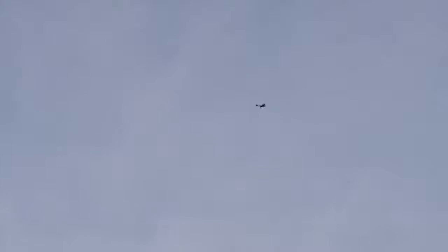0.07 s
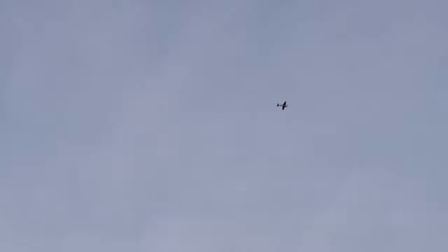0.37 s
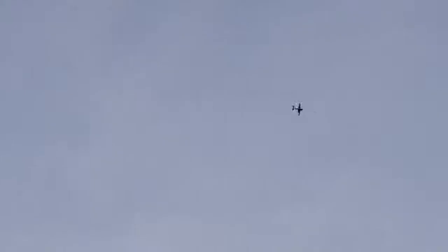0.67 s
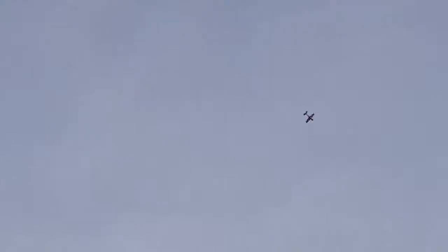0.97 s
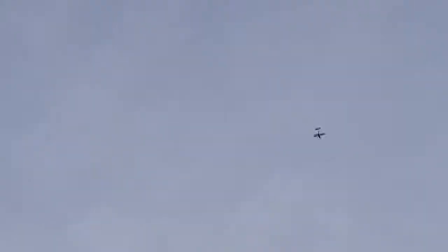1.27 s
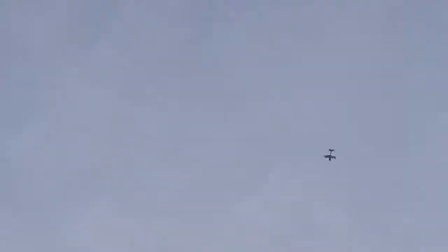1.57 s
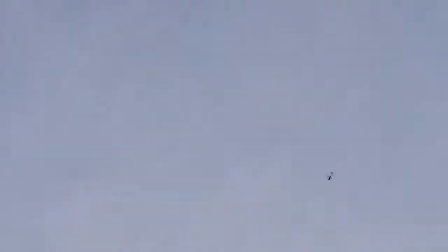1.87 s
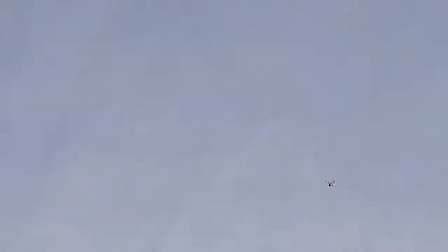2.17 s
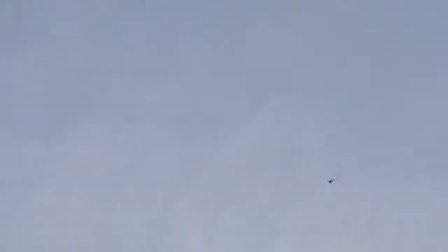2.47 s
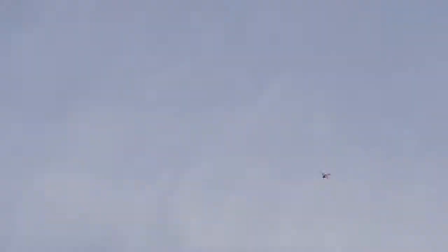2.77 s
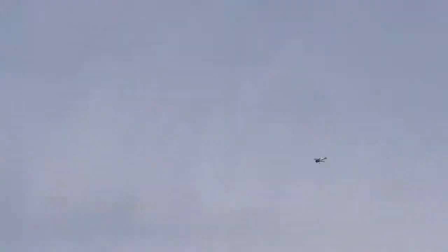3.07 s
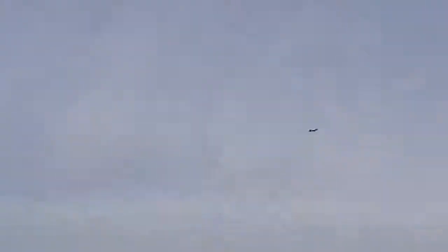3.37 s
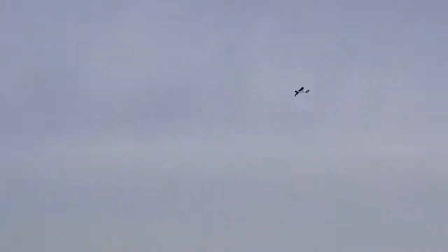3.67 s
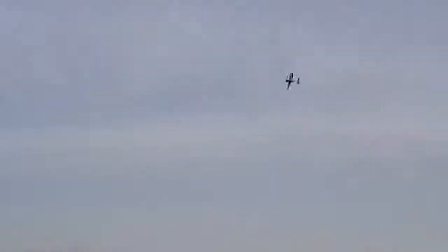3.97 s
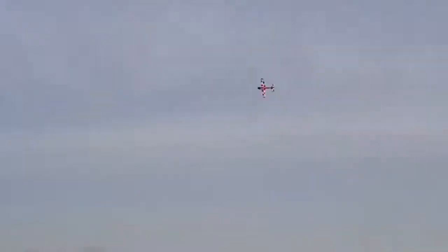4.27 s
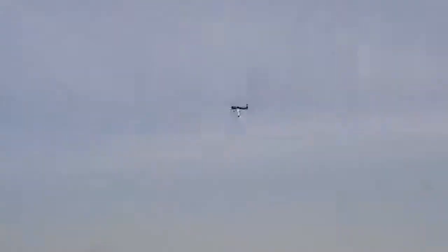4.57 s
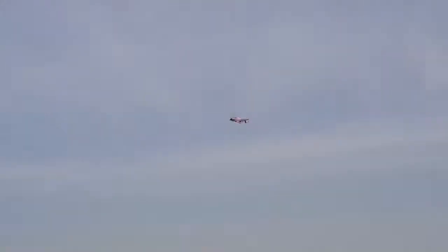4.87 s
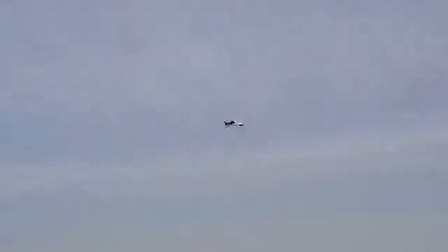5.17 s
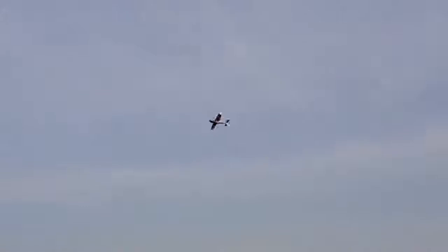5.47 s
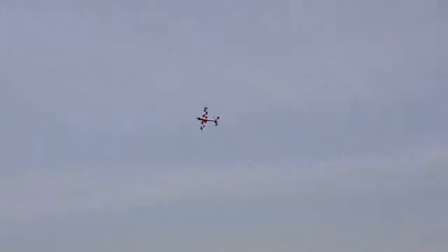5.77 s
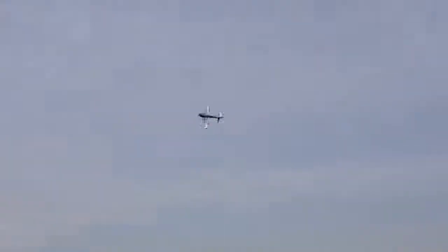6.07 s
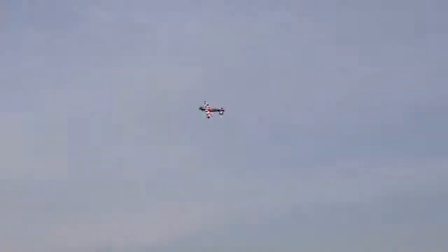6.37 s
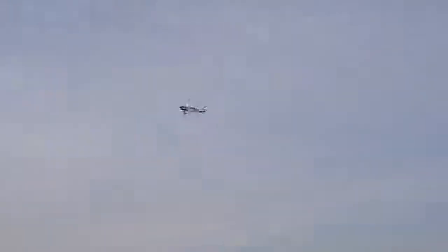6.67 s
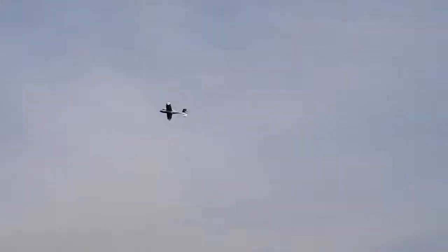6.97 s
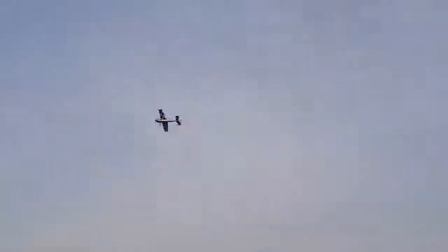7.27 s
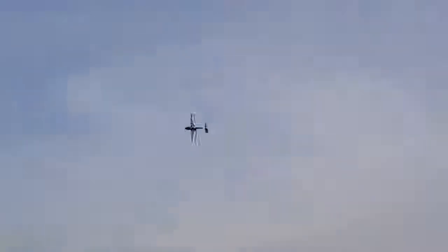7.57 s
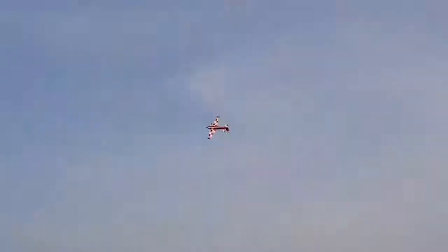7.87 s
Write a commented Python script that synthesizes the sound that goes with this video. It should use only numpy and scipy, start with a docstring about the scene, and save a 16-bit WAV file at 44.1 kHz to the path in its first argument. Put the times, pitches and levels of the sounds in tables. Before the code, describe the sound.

A raspy model plane buzzes through aerobatic rolls outdoors, its throttle dipping and sputtering before it runs at full power and comes nearer.

```python
"""A model stunt plane with a two-stroke engine rolls over an open field and comes nearer.
The throttle is blipped through the first rolls, with misfires and pops, then held open.
Each firing pushes gas through the muffler: a bark and a puff of hiss, loudest when a roll swings
the exhaust towards the listener. Engine and propeller add a low drone. Every firing arrives twice,
direct and off the ground; a low hum and soft outdoor air lie beneath."""
import sys
import numpy as np
from scipy import signal
from scipy.fft import rfft, irfft, next_fast_len
from scipy.io import wavfile
from scipy.ndimage import uniform_filter1d, map_coordinates

SR = 44100
rng = np.random.default_rng(int(sys.argv[2]) if len(sys.argv) > 2 else 0)


def to_wav(s):
    """Save 16-bit WAV."""
    ch = np.atleast_2d(s).T  # columns
    pcm = np.round(np.clip(ch, -1, 1) * 32767)  # PCM
    wavfile.write(sys.argv[1], SR, pcm.astype(np.int16))


N = 353682
TIME = np.arange(N) / SR


def from_db(db):
    """Turn decibels into a number to multiply by."""
    return 10 ** (np.asarray(db) / 20)


def rms_one(x):
    """Scale a sound to an average power of 1."""
    return x / np.sqrt(np.mean(x ** 2) + 1e-20)


def in_time(rows):
    """Join a table's rows with straight lines: one curve in time per value column."""
    times, *columns = np.transpose(rows)
    return [np.interp(TIME, times, column) for column in columns]


def at_hz(spectrum, hz):
    """Look up a level between the listed frequencies, on a scale of octaves."""
    listed_hz, db = np.transpose(spectrum)
    return np.interp(np.log(hz + 1e-3), np.log(listed_hz), db)


def coloured(x, spectrum, amount=1):
    """Turn each frequency up or down by a table's decibels times amount."""
    size = next_fast_len(N + SR // 10)
    hz = np.arange(size // 2 + 1) * SR / size
    return irfft(rfft(x, size) * from_db(amount * at_hz(spectrum, hz)), size)[..., :N]


def band(x, hz, kind, order=3):
    """Keep a range of frequencies without delaying the sound."""
    return signal.sosfiltfilt(signal.butter(order, hz, kind, fs=SR, output="sos"), x)


def drift(rate_hz, step=50):
    """A smooth random wobble, about 1 in size."""
    pole = np.exp(-2 * np.pi * rate_hz * step / SR)
    noise = rng.standard_normal(N // step + 2002)
    slow = signal.lfilter([1], [1, -2 * pole, pole * pole], noise)[2000:]
    return np.interp(np.arange(N) / step, np.arange(len(slow)), rms_one(slow))


def delayed(x, ms):
    """Play a sound later, by a time that may keep changing."""
    return map_coordinates(x, [np.arange(N) - ms * SR / 1000], order=3, mode="mirror")


def loudness(x, size=1500):
    """The average strength of a sound over a few firings."""
    power = uniform_filter1d(uniform_filter1d(x * x, size), size)
    return np.sqrt(np.abs(power) + 1e-12)


# how fast the engine fires, as heard: (time [s], firing rate [Hz])
FIRING_RATE = [(0.0, 112.8), (0.114, 111.8), (0.483, 114.6), (0.821, 115.1), (0.992, 118.1), (1.104, 117.7),
               (1.186, 97.9), (1.309, 109.3), (1.486, 114.7), (1.606, 114.0), (1.712, 117.6), (1.854, 81.1),
               (1.981, 99.6), (2.091, 94.2), (2.25, 102.0), (2.43, 100.2), (2.563, 111.1), (2.792, 78.2),
               (2.963, 110.3), (3.106, 104.0), (3.233, 114.9), (3.417, 95.9), (3.583, 115.3),
               (3.707, 120.0), (3.781, 120.0), (3.907, 101.3), (4.098, 117.4), (4.273, 116.2),
               (4.365, 106.7), (4.597, 119.0), (4.783, 120.7), (4.85, 118.4), (5.044, 124.3),
               (5.261, 124.5), (5.328, 121.3), (5.521, 125.7), (5.712, 125.7), (5.747, 124.0),
               (6.079, 126.3), (6.556, 126.4), (6.79, 123.3), (7.04, 126.1), (7.045, 125.5), (7.158, 123.2),
               (7.338, 123.2), (7.384, 121.6), (7.614, 121.5), (7.758, 119.8), (8.02, 120.0)]

def engine_speed(inertia_s=.035):
    """One firing per turn of the shaft; the weight of shaft and propeller smooths each change."""
    return uniform_filter1d(in_time(FIRING_RATE)[0], int(inertia_s * SR))


def firing_strength(turns, spread_db):
    """Every burn of fuel has a random strength of its own."""
    firings = np.arange(1000)
    chance = np.clip(rng.standard_normal(len(firings)), -2, 2)
    strength = from_db(spread_db * np.interp(turns, firings, chance))
    return strength / loudness(strength)


# moments when the exhaust faces the listener, with base levels for its four tone bands and its hiss:
# (time [s], bark [dB], blare [dB], bite [dB], edge [dB], rasp [dB])
ROLLS = [(0.109, -37.5, -39, -47.5, -44, -50.5), (0.772, -39, -37, -42.5, -41.5, -47.5),
         (1.435, -37, -37.5, -49, -41.5, -50.0), (2.089, -40, -40.5, -45.5, -43.5, -53.0),
         (2.571, -40.5, -42.5, -46, -42, -53), (3.171, -43, -37.5, -44.5, -42.0, -50.5),
         (3.694, -36.5, -36.5, -44.5, -41.5, -48), (4.171, -33.0, -36.5, -38.5, -40.5, -45.5),
         (4.676, -30.5, -35, -41, -39, -45.5), (5.156, -31, -34, -37.5, -39, -43.5),
         (5.647, -30, -33, -37.5, -38, -43), (6.14, -30, -36, -35, -34, -42),
         (6.639, -31, -33.5, -32.5, -34.5, -40), (7.144, -31, -34.5, -32, -35.5, -41.5),
         (7.64, -31.5, -34.5, -34.5, -36, -40), (8.209, -26.5, -42, -33, -34, -44)]

def rolling():
    """The plane turns once from each row to the next; its exhaust grows louder as it nears."""
    times = np.transpose(ROLLS)[0]
    times = np.r_[2 * times[0] - times[1], times]  # already rolling at the start
    return np.interp(TIME, times, np.arange(len(times))), in_time(ROLLS)


# how fully the loud and quiet directions are heard, most when side-on: (time [s], share [0-1])
SIDE_ON = [(0, 0.3), (3.8, 0.1), (5.3, 0.94), (7.35, 1), (7.65, 0.67), (8.02, 0.74)]

def beamed(pattern, roll):
    """Decibels gained or lost as the roll sweeps loud and quiet directions past the listener."""
    angle, *columns = np.transpose(pattern)
    swept_db = np.array([np.interp(roll, angle, column, period=1) for column in columns])
    return in_time(SIDE_ON)[0] * swept_db


def effort(speed, db_per_octave, cruise_hz=120):
    """Decibels gained or lost as the engine runs above or below cruising speed."""
    return np.outer(db_per_octave, np.log2(speed / cruise_hz))


# loud and quiet directions of the exhaust around the plane:
# (angle from the listener [turns], bark [dB], blare [dB], bite [dB], edge [dB], rasp [dB])
EXHAUST_BEAM = [(-0.5, -0.5, 6.5, 1.0, 0.5, 1.5), (-0.42, 6.5, -4, -5, -5, 2), (-0.33, 0, -1.5, -1, 0, 2),
                (-0.25, -2, -1, -9, 2.5, 3), (-0.17, 3.5, -1, 2, 3.5, 3.5),
                (-0.08, 2.5, 2.5, 0.5, 0.0, 3.5), (0.0, 3, 2, 0.5, -2.0, 0.5), (0.08, 1.5, 1.5, 1.5, -4, 4),
                (0.17, 1, -2.0, -7.5, 1, 2.5), (0.25, -4.5, 1, -5, -1.0, 1), (0.33, 1.5, -6.5, 0, -1, 0.5),
                (0.42, 1, -1.5, -4.5, 0.5, 0.5)]

def exhaust_levels(base_db, speed, roll):
    """Bark, blare, bite, edge and rasp swell once a roll and change with engine speed."""
    swing_db = np.outer([4, 4.6, 5.5, 3.9, 5.03], np.cos(2 * np.pi * roll))
    effort_db = effort(speed, db_per_octave=[-5, -0.5, -2, 9.5, -1])
    return base_db + swing_db + beamed(EXHAUST_BEAM, roll) + effort_db


# the tone bands bark, blare, bite and edge: (lowest tone [x firing rate], highest tone [x firing rate])
TONE_BANDS = [(6, 8), (9, 11), (12, 14), (15, 40)]
# how well the muffler lets each frequency out: (frequency [Hz], level [dB])
MUFFLER_COLOUR = [(500, 11), (780, 10.5), (1050, 8.5), (1350, 4), (1600, 1), (1850, -2), (2250, -8.5),
                  (2700, -18), (3300, -25.5), (5000, -38), (6500, -42)]

def exhaust_bark(turns, speed, strength, levels_db, roll, flutter_db=2.5):
    """Each firing is a sharp push and suck of gas, built from tones at multiples of the firing rate."""
    shaft, out = np.exp(2j * np.pi * turns), np.zeros(N)
    flutters = [from_db(flutter_db * drift(9)) for _ in range(7)]
    # swirling gas blurs the higher tones, most when the exhaust faces away
    eddies = [drift(25) + 1j * drift(25) for _ in range(5)]
    blur = .022 * (1 - .5 * np.cos(2 * np.pi * roll))
    for (first, last), db in zip(TONE_BANDS, levels_db):
        tone, pulses = shaft ** first, np.zeros(N)
        smears = [1 + first * blur * eddy for eddy in eddies]
        for k in range(first, last + 1):
            colour = np.repeat(from_db(at_hz(MUFFLER_COLOUR, k * speed[::16])), 16)[:N]
            pulses -= colour * flutters[k % len(flutters)] * (tone * smears[k % len(smears)]).imag
            tone = tone * shaft  # step up to the next multiple
        heard = with_ground(muffler(pulses * strength))
        out += from_db(db) * heard / loudness(heard)  # even the band out, then set its level
    return out


def muffler(pulses, chamber_hz=1900, ring_hz=2290, ring_gain=1.8):
    """The chamber draws each pulse out, and the can adds a nasal ring."""
    held_back = signal.lfilter(*signal.iirpeak(chamber_hz, Q=3, fs=SR), pulses)
    drawn_out = pulses - 2 * held_back
    ring = signal.lfilter(*signal.iirpeak(ring_hz, Q=8, fs=SR), drawn_out)
    return drawn_out + ring_gain * ring


# the sound's bounce off the ground: (time [s], extra travel time [ms], share sent back [0-1])
GROUND_BOUNCE = [(0, 6.06, .4), (.8, 6.0, .56), (1.4, 5.83, .46), (2, 5.34, .65), (2.6, 4.59, .63),
                 (3.1, 4.14, .63), (3.6, 3.6, .5), (4.15, 3.16, .68), (5.15, 2.94, .68), (5.9, 2.93, .63),
                 (6.3, 3.11, .31), (6.7, 3.14, .45), (7.15, 3.25, .65), (7.6, 3.25, .65), (8.02, 3.05, .46)]

def with_ground(x, dull_above_hz=5000):
    """Grass sends back a duller copy a few milliseconds later."""
    delay_ms, share = in_time(GROUND_BOUNCE)
    pole = np.exp(-2 * np.pi * dull_above_hz / SR)
    dull = signal.filtfilt([1 - pole], [1, -pole], x)
    return x + share * delayed(dull, delay_ms)


# base levels of the drone's five tones, at 1 to 5 times the firing rate:
# (time [s], firing tone [dB], blade tone [dB], third [dB], fourth [dB], fifth [dB])
DRONE_LEVELS = [(0.0, -42, -43, -30, -37, -54), (0.4, -44, -38, -33, -41, -49),
                (0.48, -55, -33.5, -36.5, -33, -50), (0.72, -40.5, -46, -42, -35, -43),
                (0.88, -40, -38.5, -36.5, -32, -48), (1.04, -41.0, -53, -34, -29, -61),
                (1.2, -55, -28.5, -34.0, -59, -35), (1.36, -44, -39.5, -31.0, -36, -43),
                (1.68, -43, -42, -29.0, -39, -50), (1.76, -52, -37, -36, -57, -45),
                (1.84, -45, -39, -50, -35, -34), (2.24, -57, -31, -46, -50, -40),
                (2.32, -55, -42, -52, -39, -44), (2.48, -56.0, -28, -42.5, -50, -42),
                (2.56, -52.0, -29.5, -45, -35, -40), (2.8, -45, -55, -34.5, -47, -36),
                (2.96, -57, -34.0, -42, -44, -40), (3.12, -54, -31, -38.5, -44, -32.5),
                (3.2, -47.0, -40, -43, -35.5, -32.5), (3.52, -56, -35, -33.5, -49.0, -33.5),
                (3.6, -46, -28, -41, -34, -34), (3.76, -43, -33.5, -46, -33, -33),
                (3.92, -50, -38, -32, -56.5, -33), (4.16, -42.0, -30, -36, -36.5, -30.5),
                (4.24, -41, -41, -30.5, -43, -35), (4.4, -53, -37.5, -33.5, -53, -37),
                (4.64, -38, -30, -36, -41, -31.5), (4.8, -42, -36, -39.5, -42.0, -32),
                (6.88, -44, -29.5, -42.5, -35, -26.5), (7.12, -46, -35.5, -38, -33.5, -30.5),
                (7.2, -42.5, -27.5, -50, -35.5, -20.5), (7.28, -48, -31, -29, -34.0, -29.5),
                (7.44, -44.0, -24, -49, -31, -28), (7.52, -49.5, -21.5, -46.0, -47, -21.5),
                (7.6, -40, -35.5, -47, -35.5, -24), (7.76, -40, -27, -30, -42, -24.5),
                (7.84, -45, -29.5, -40, -34, -32.5), (8.02, -46, -22, -30.5, -31, -27.5)]
# loud and quiet directions of the drone around the plane:
# (angle from the listener [turns], firing tone [dB], blade tone [dB], third [dB], fourth [dB], fifth [dB])
DRONE_BEAM = [(-0.5, -5, 4, 2, -1.5, 1), (-0.44, -1.5, 2, 3, -3, 0.5), (-0.38, -8, 0.5, 6.5, -8.5, -8),
              (-0.31, -5.5, -1.5, 6.5, -3.5, -5.5), (-0.25, -2.0, -1, 1, 2.5, -4),
              (-0.19, 1, 2, 0.5, 3.5, 2.5), (-0.12, -1.5, 0.5, 5, 6.0, -1), (-0.06, 3, 5.5, -2.5, 5, 2),
              (0.0, 2, 3.5, 6, -0.5, 3.5), (0.06, 1, 6, -3, 4.0, 3.0), (0.12, 1.5, 4, 0, 4.5, 0),
              (0.19, 0.5, -0.5, -0.5, 2, 1.5), (0.25, 2.5, -14, -11.5, -1.5, 0),
              (0.31, 2.5, -4.5, -2, -1, -0.5), (0.38, 1, 2, -2.5, -20.5, -5),
              (0.44, -2.5, 2.5, -2.5, 0, -5)]

def drone(turns, speed, strength, roll, trim_db=0.25):
    """Engine and propeller make five low tones; the higher ones flutter more."""
    levels_db = in_time(DRONE_LEVELS) + beamed(DRONE_BEAM, roll) + effort(speed, db_per_octave=8)
    delay_ms, share = in_time(GROUND_BOUNCE)
    out = np.zeros(N)
    for k, level_db in enumerate(levels_db, 1):
        bounce = share * np.exp(-2j * np.pi * k * speed * delay_ms / 1000)
        shift = np.angle(1 + bounce)  # the ground bounce nudges each wave earlier or later
        flutter_db = np.sqrt(k) * drift(12)
        gain = np.sqrt(2) * from_db(level_db + trim_db + flutter_db)
        out -= gain * np.sin(2 * np.pi * k * turns + shift)
    return out * strength


# hiss of the gas jet: (frequency [Hz], level [dB])
HISS_COLOUR = [(200, -2), (450, 5), (1000, 6), (1600, 6.5), (2300, 10), (2800, 4), (4000, 3), (5300, 2),
               (6400, -3.5), (7600, 5.5), (8800, -10.5), (10000, -20), (11400, -20.5), (14500, -37.5)]
# how wide the hiss sounds: (frequency [Hz], part that differs between the ears against shared part [dB])
HISS_WIDTH = [(700, -14), (2000, -13), (4000, -5), (7000, -3.5), (9000, -8), (12000, -6)]
# which way the hiss leans: (frequency [Hz], left minus right [dB])
HISS_LEAN = [(3000, -1.5), (6000, 3.5), (8000, 3.5), (9200, -11), (11000, 12)]
# the very top of the hiss, faint at first and brighter later: (time [s], level [dB])
HISS_TOP = [(0, -16), (1.4, -3.5), (2.5, 0), (3.7, 9), (4.5, 12), (5.5, 11), (6.5, 13), (8.02, 12)]

def rasp(turns, level_db, roll, puff_turns=.08, trim_db=-1):
    """Each firing lets out a short puff of hiss over the swish of the blades."""
    facing = np.cos(2 * np.pi * roll)  # 1 when the exhaust points at the listener
    swish = .3 * from_db(-1.5 * facing)
    since_puff = (turns + .03) % 1
    puffs = np.exp(-since_puff / puff_turns) * firing_strength(turns, spread_db=1.6)
    shared, side = [with_ground((swish + puffs) * rng.standard_normal(N)) for _ in range(2)]
    shared = coloured(shared, HISS_COLOUR)
    side = coloured(coloured(side, HISS_COLOUR), HISS_WIDTH)
    ears = np.array([coloured(shared + sign * side, HISS_LEAN, sign / 2) for sign in (1, -1)])
    top = band(ears, 9600, "high", order=6)
    ears = ears - top + top * from_db(in_time(HISS_TOP)[0])
    # the upper treble comes out in a narrower beam than the rest
    upper = band(ears, 6300, "high", order=4)
    ears = ears - upper + upper * from_db(3 * (facing - 1.5))
    return ears * from_db(level_db + trim_db) / np.std(band(shared, [3000, 9000], "band"))


# how far to the right the plane is: (time [s], delay at the left ear [ms])
LEFT_EAR_DELAY = [(0, .015), (1.7, .04), (4.2, .045), (5.3, .025), (6.2, .01), (8.02, 0)]

def near_reflection(engine, lag_ms=1.1):
    """A quick echo reaches the ears unequally; gives both ears and the left ear's delay."""
    late_ms, = in_time(LEFT_EAR_DELAY)
    echo_db = -20 + 150 * late_ms  # stronger when the plane is off to one side
    echo = delayed(band(engine, 970, "high"), lag_ms) * from_db(echo_db)
    return np.array([engine + echo, engine - echo]), late_ms


# what the surroundings send back: (frequency [Hz], level against the direct sound [dB])
SCATTER_COLOUR = [(250, -18), (600, -11), (1200, -9), (2200, -4.5), (4000, -5), (10000, -3)]

def scatter(x, fade_s=.12):
    """The surroundings return a short wash of echoes; its upper part differs between the ears."""
    tails = rng.standard_normal((2, SR)) * from_db(-60 * TIME[:SR] / fade_s)
    tails /= np.linalg.norm(tails[0])
    shared, side = signal.fftconvolve(coloured(x, SCATTER_COLOUR)[None], tails, axes=1)[:, :N]
    side = 0.09 * band(side, 500, "high", order=1)
    return np.array([shared + side, shared - side])


# the colour of the outdoor air: (frequency [Hz], relative level [dB])
AIR_COLOUR = [(20, -30), (40, -3.5), (65, -24), (110, -7), (170, -15), (400, -9), (900, -9), (1500, -20),
              (2200, -22), (5000, -45), (8500, -74), (12000, -72)]

def outdoor_air(level_db=-47):
    """A soft, low rush, almost the same in both ears."""
    shared, side = rms_one(coloured(rng.standard_normal((2, N)), AIR_COLOUR))
    return from_db(level_db) * np.array([shared + side / 10, shared - side / 10])


def low_hum(pitch_hz=77.6, waver_hz=6.4, level_db=-48.5):
    """One low tone that wavers in strength and pitch."""
    wavering = drift(waver_hz) + 1j * drift(waver_hz)
    tone = (1 + 0.66 * wavering) * np.exp(2j * np.pi * pitch_hz * TIME)
    return from_db(level_db) * rms_one(tone.real)


# stretches of weak firing: (start [s], end [s], level the bark loses [dB])
MISFIRES = [(1.145, 1.24, 4), (1.755, 1.9, 8.5), (2.627, 2.725, 7.5), (3.314, 3.08, 5.5),
            (3.399, 3.425, 4.5), (3.798, 4.06, 2)]

def misfire_loss(fade_s=.012):
    """With the throttle shut the engine misfires, and its bark drops by this many decibels."""
    dips = [db * np.clip(1 + np.minimum(TIME - start, end - TIME) / fade_s, 0, 1)
            for start, end, db in MISFIRES]
    return np.max(dips, axis=0)


# single hard burns amid the misfiring: (time [s], peak at the muffler [dB])
POPS = [(1.736, -29), (1.764, -25), (1.784, -23.5), (1.825, -26.5), (1.861, -26), (1.885, -22),
        (2.625, -19), (2.644, -17), (2.665, -18), (2.685, -18.5), (2.73, -27.5), (2.78, -33), (3.401, -19),
        (3.42, -23), (3.8, -21), (3.809, -18), (3.818, -17), (3.835, -22), (3.854, -18.5), (3.873, -24),
        (3.892, -23)]

def pops(low_hz=190, body_hz=590, top_hz=2700):
    """Unburnt fuel catches after a misfire: one push and suck through the muffler."""
    filters = np.vstack([signal.butter(1, [low_hz, body_hz], "band", fs=SR, output="sos"),
                         signal.butter(2, [low_hz, top_hz], "band", fs=SR, output="sos"),
                         signal.butter(2, top_hz, fs=SR, output="sos")])
    pop = signal.sosfilt(filters, signal.unit_impulse(SR // 20))
    burns = np.zeros(N)
    for start, db in POPS:
        burns[int(start * SR)] = from_db(db)
    return with_ground(signal.fftconvolve(burns, pop / pop.max())[:N])


def scene():
    """One shaft drives bark, drone and rasp; the roll sweeps them past the listener."""
    speed, loss_db = engine_speed(), misfire_loss()
    roll, base_db = rolling()
    *bands_db, rasp_db = exhaust_levels(base_db, speed, roll)
    # misfiring makes both the timing and the strength of the burns uneven
    turns = np.cumsum(speed) / SR + 0.0046 * loss_db * drift(56)
    strength = firing_strength(turns, spread_db=0.8 + 0.42 * loss_db)
    barking = from_db(-loss_db) * exhaust_bark(turns, speed, strength, bands_db, roll)
    droning = from_db(-0.54 * loss_db) * drone(turns, speed, np.sqrt(strength), roll)
    engine, late_ms = near_reflection(barking + droning + pops())
    left, right = engine + rasp(turns, rasp_db - 0.72 * loss_db, roll)
    plane = np.array([from_db(.3) * delayed(left, late_ms), right])
    return plane + scatter(right) + outdoor_air() + low_hum()


def record(dry):
    """Cut the very highest treble steeply."""
    cutoff_hz = 14800
    return signal.sosfilt(signal.ellip(10, .1, 80, cutoff_hz, fs=SR, output="sos"), dry)


dry = scene()
out = record(dry)
to_wav(out)
```